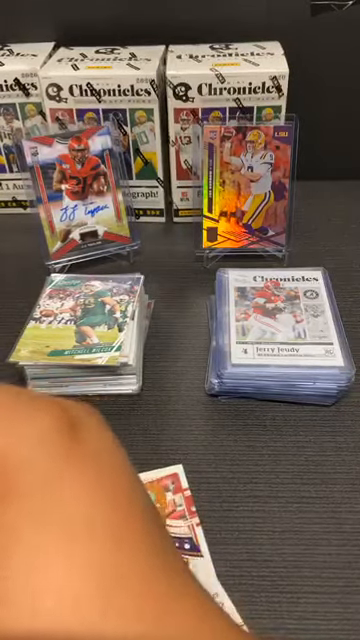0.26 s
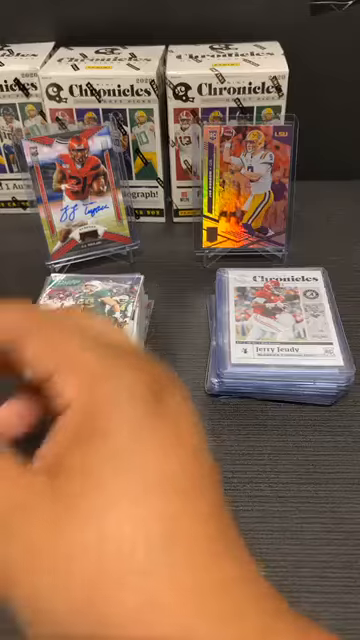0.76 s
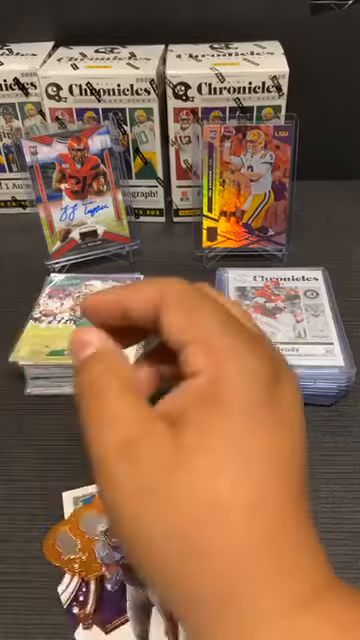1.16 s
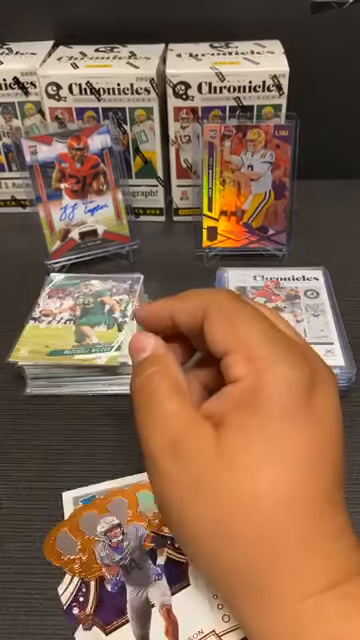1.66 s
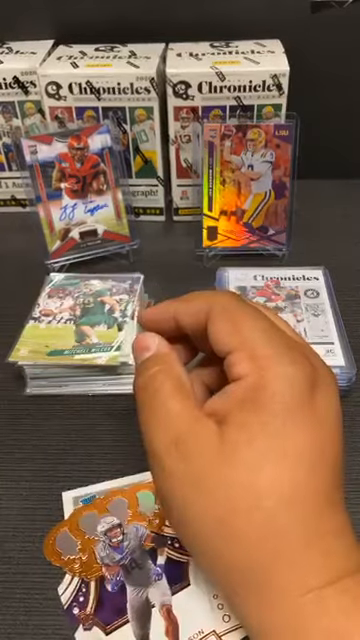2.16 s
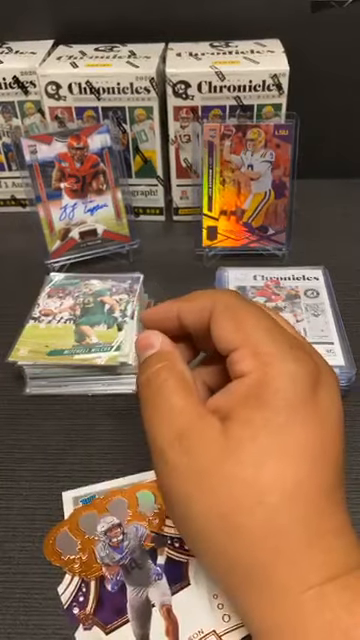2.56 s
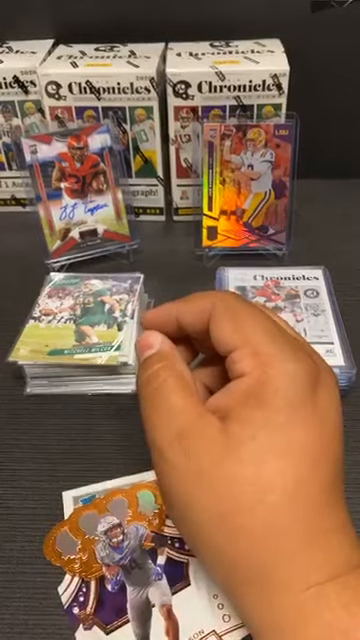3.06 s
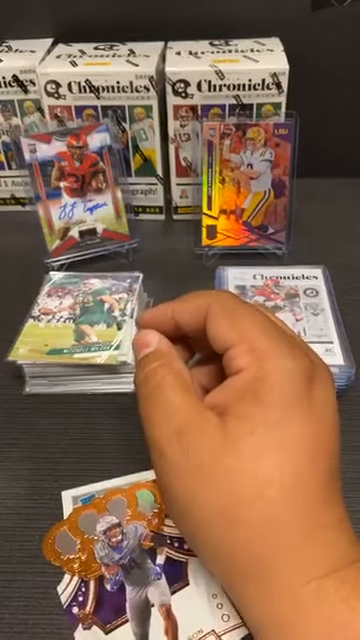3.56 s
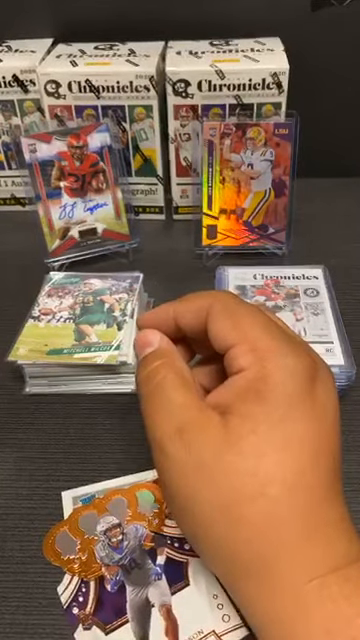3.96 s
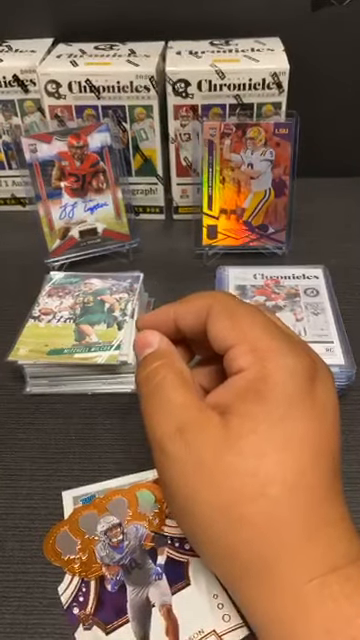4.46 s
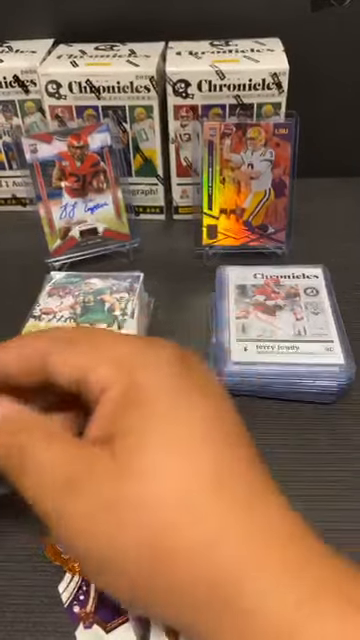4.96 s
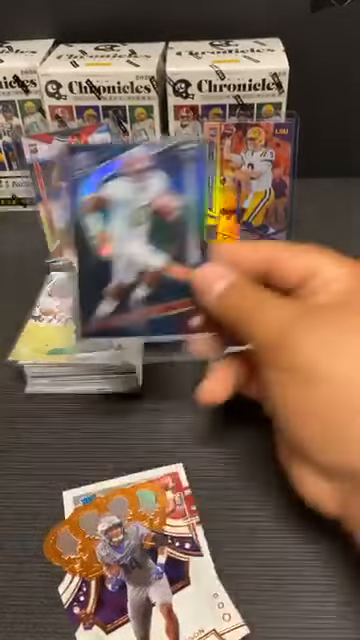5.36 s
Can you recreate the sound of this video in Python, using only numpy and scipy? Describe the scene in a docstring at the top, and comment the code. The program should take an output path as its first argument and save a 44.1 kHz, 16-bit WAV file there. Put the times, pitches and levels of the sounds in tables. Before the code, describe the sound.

After a faint tap or two, a hand knocks firmly on a table at a quick, uneven pace, ending in soft card handling.

```python
"""Knocks on a tabletop

Thirteen knocks close to a phone in a quiet room, with light taps before and after them. Each blow rings
the damped modes of the top as a bending wave: treble travels fastest, so the click comes before the thud.
A noise crack, diffuse tails and slow, wavering resonances go with it. Cards are touched (short noise puffs)
and slide (hiss and drag) over a bed of shaped noise: house rumble, room tone and a steady rustle."""
import sys
import numpy as np
from scipy import signal
from scipy.fft import rfft, irfft, next_fast_len
from scipy.io import wavfile
from scipy.ndimage import uniform_filter1d, map_coordinates

SR = 44100
rng = np.random.default_rng(int(sys.argv[2]) if len(sys.argv) > 2 else 0)


def unload_wav(signal):
    """Save mono or channel-first audio to the path in sys.argv[1] as 16-bit WAV at rate SR, clipped to [-1, 1]."""
    wavfile.write(
        sys.argv[1],
        SR,
        np.round(np.clip(np.atleast_2d(signal).T, -1, 1) * 32767).astype(np.int16),
    )


N = 247037
SIZE = 2 ** 15  # samples in the transform of one blow
BLOW_HZ = np.fft.rfftfreq(SIZE, 1 / SR)
BLOW_T = np.arange(SIZE // 2) / SR  # seconds


def amp(db):
    """Decibels to amplitude."""
    return 10 ** (np.asarray(db) / 20)


def unit(x):
    """Scale to rms 1."""
    return x / np.sqrt(np.mean(x ** 2) + 1e-20)


def along(points, hz):
    """Read a curve of (f/Hz, value) points on a log frequency axis."""
    f, v = np.transpose(points)
    return np.interp(np.log(hz + 1), np.log(f + 1), v)


def filtered(x, response):
    """Multiply the spectrum of x by a function of frequency."""
    m = next_fast_len(N + 8192)
    return irfft(rfft(x, m) * response(np.fft.rfftfreq(m, 1 / SR)), m)[:N]


def add(track, sound, s):
    """Mix a sound in from time s."""
    part = track[round(s * SR):][:len(sound)]
    part += sound[:len(part)]


def wobble(rate, count, t):
    """A smooth random curve through count knots, rate knots per unit of t."""
    return map_coordinates(rng.standard_normal(count), [t * rate])


def rush(spectrum, patchy_db):
    """Shaped noise of rms 1 with random gain patches in time and frequency."""
    z = signal.stft(rng.standard_normal(N), nperseg=1024)[2]
    field = uniform_filter1d(rng.standard_normal(z.shape), 5, 0)
    field = uniform_filter1d(field, 4, 1)
    noise = signal.istft(z * amp(patchy_db * unit(field)), nperseg=1024)[1][:N]
    return unit(filtered(noise, lambda hz: amp(along(spectrum, hz))))


# background levels over time: (t/s, rumble level/dB, room tone level/dB)
FLOOR = [(0.0, -63, -68), (.45, -63.5, -69), (1.2, -61, -68), (2.3, -60.5, -68.5), (3.0, -61.5, -71.5),
         (3.7, -59.5, -62.5), (4.4, -65, -69), (5.6, -66.5, -69.5)]
# noise colours, relative levels: (f/Hz, level/dB)
RUMBLE_COLOUR = [(12, -44), (36, -20.5), (60, 3.5), (97, 1.5), (125, -2), (198, -14.5), (289, -13),
                 (400, -23), (520, -48), (880, -120)]
ROOM_TONE_COLOUR = [(88, -33.5), (150, -8.5), (200, 0), (291, -5.5), (375, -10), (756, -14), (3000, -30),
                    (3900, -53), (6600, -120)]
RUSTLE_COLOUR = [(880, -27.5), (1500, -4), (2450, -12), (3220, -8.5), (3690, -8), (7620, -11), (13600, -21),
                 (15600, -22)]
RUSTLE_DB = -80.5


def background():
    """House rumble and room tone drift in level under a steady rustle."""
    s, *levels = np.transpose(FLOOR)
    rumble, room_tone = [amp(np.interp(np.arange(N) / SR, s, level)) for level in levels]
    bed = rumble * rush(RUMBLE_COLOUR, patchy_db=-0.5)
    bed += room_tone * rush(ROOM_TONE_COLOUR, patchy_db=3.5)
    return bed + amp(RUSTLE_DB) * rush(RUSTLE_COLOUR, patchy_db=2.3)


# cards sliding over each other: (start t/s, length t/s, hiss level/dB, drag level/dB)
SLIDES = [(3.599, 0.65, -82, -79), (4.914, .32, -78.5, -73.5), (5.328, 0.19, -75, -69.5)]
# noise colours of the slide, relative levels: (f/Hz, level/dB)
HISS_COLOUR = [(710, -16), (1200, -3), (1520, -4), (1920, -2), (3180, -8), (3860, -6.5), (7760, -12),
               (15600, -23.5)]
DRAG_COLOUR = [(120, -32.5), (230, -4), (370, 2), (600, -10), (1200, -34)]
SLIDE_EDGE_S = .09  # fade in and out
CATCH_DB, LUMP_DB = 2.5, 1.5  # unevenness of the hiss and of the drag


def slides():
    """Card on card: a hiss that catches and a lumpy low drag, faded in and out on each stroke."""
    t = np.arange(N) / SR
    hiss, drag = np.zeros(N), np.zeros(N)
    for s, length, hiss_db, drag_db in SLIDES:
        from_edge = np.minimum(t - s, s + length - t)
        stroke = np.clip(from_edge / SLIDE_EDGE_S + .5, 0, 1)
        hiss += stroke * amp(hiss_db)
        drag += stroke * amp(drag_db)
    catch = amp(CATCH_DB * wobble(160, int(N * 160 / SR) + 4, t))
    lumps = amp(LUMP_DB * wobble(30, int(N * 30 / SR) + 4, t))
    return hiss * catch * rush(HISS_COLOUR, patchy_db=0.0) + drag * lumps * rush(DRAG_COLOUR, patchy_db=5.0)


# small touches of cards: (t/s, level/dB before rise and decay, centre f/Hz, width/octaves, t60/s)
TOUCHES = [(0.63, -69, 10000, 1.6, 0.1), (0.63, -63.5, 3400, 0.21, 0.019), (.785, -58, 8200, 0.63, 0.026),
           (.795, -65, 7000, 1.5, 0.059), (3.753, -59, 1334, 0.16, 0.24), (3.758, -65, 2520, 0.87, 0.12),
           (4.098, -66, 2500, 1.2, 0.014), (4.272, -64, 3000, 1.7, 0.0082),
           (5.196, -64.5, 1200, 1.6, 0.033), (5.322, -59, 2500, 1.8, 0.0084)]
# fingertips landing just ahead of some knocks: (t/s, level/dB before rise and decay)
FINGERTIPS = [(1.152, -43.5), (1.412, -37.5), (2.529, -34.5), (2.836, -34), (4.451, -55), (4.461, -36.5),
              (4.702, -40.5)]
FINGERTIP_HZ, FINGERTIP_OCTAVES, FINGERTIP_T60_S = 720, 1.4, 0.06
RISE_SHARE = .03  # rise time as a share of t60


def touches():
    """Cards and fingertips: short puffs of noise around a centre pitch, quick to rise and decaying."""
    out, t = np.zeros(N), np.arange(8192) / SR
    hz = np.fft.rfftfreq(len(t), 1 / SR) + 1
    tips = [(s, db, FINGERTIP_HZ, FINGERTIP_OCTAVES, FINGERTIP_T60_S) for s, db in FINGERTIPS]
    for s, db, centre_hz, width, t60 in TOUCHES + tips:
        band = np.exp(-(np.log2(hz / centre_hz) / width) ** 2) / np.sqrt(hz)
        noise = unit(irfft(rfft(rng.standard_normal(len(t))) * band))
        rise = 1 - np.exp(-t / (RISE_SHARE * t60))
        add(out, amp(db - 60 * t / t60) * noise * rise, s)
    return out


def late(s):
    """Delay a blow's spectrum by s seconds."""
    return np.exp(-2j * np.pi * BLOW_HZ * s)


# slow resonances of table and room: (f/Hz, relative level/dB, t60/s)
RESONANCES = [(69.2, -2.5, 0.62), (112.4, 3, 0.4), (247, -7, 0.14), (537, -15.5, 0.24)]
ROOM_DB = -72  # common level over the thud
RING_SCATTER_DB = 3  # random spread from blow to blow
WAVER_DB, WAVER_RATE = 4.5, 23.6  # the resonances beat and break up, knots a second


def slow_resonances(wood):
    """Wavering decaying sines, each as strong as the wood drives its pitch."""
    t = BLOW_T
    drive = uniform_filter1d(abs(wood), 40)
    ring = np.zeros(len(t))
    for f, level, t60 in RESONANCES:
        decay = amp(level + rng.normal(0, RING_SCATTER_DB) - 60 * t / t60)
        waver = amp(WAVER_DB * wobble(WAVER_RATE, 64, t))
        tone = np.sin(2 * np.pi * (f * rng.normal(1, 0.022) * t + rng.random()))
        ring += np.interp(f, BLOW_HZ, drive) * decay * waver * tone
    swell = 1 - np.exp(-(t / 0.01) ** 2)
    return amp(ROOM_DB) * ring * swell


def scatter(decay):
    """A new diffuse tail of energy 1, each frequency dying at its own speed."""
    hz, t, z = signal.stft(rng.standard_normal(SIZE // 2), SR, nperseg=512, noverlap=448)
    fading = z * amp(-60 * t / along(decay, hz)[:, None])
    tail = signal.istft(fading, SR, nperseg=512, noverlap=448)[1]
    return rfft(tail / np.linalg.norm(tail), SIZE)


# share of each blow scattered by table and room, and its decay: (f/Hz, level/dB), (f/Hz, t60/s)
SCATTERED = [(80, -9), (250, -8), (700, -3.5), (2000, -6), (6000, -2.5)]
SCATTERED_DECAY = [(60, 0.086), (160, 0.077), (420, 0.079), (1100, 0.077), (2900, 0.13), (8000, 0.13)]
# the far walls answer late and faintly: (f/Hz, level/dB), (f/Hz, t60/s)
WALLS = [(80, -24.5), (250, -25.5), (600, -18), (2000, -29), (6000, -25)]
WALLS_DECAY = [(100, 0.46), (600, 0.13), (3000, 0.75), (10000, 0.2)]


def reflections():
    """Diffuse sound from table and room after 3.3 ms and from the far walls after 28 ms."""
    near = amp(along(SCATTERED, BLOW_HZ)) * late(0.0033) * scatter(SCATTERED_DECAY)
    far = amp(along(WALLS, BLOW_HZ)) * late(0.028) * scatter(WALLS_DECAY)
    return near + far


# colour of the crack through the air: (f/Hz, level/dB)
CRACK = [(700, -21), (1100, 2.5), (1300, -2), (1700, 7), (2100, -1.5), (2400, 0), (4400, -13),
         (6900, -16.5), (10000, -30), (15500, -39)]
GRAIN_DB = 2.5  # random peaks and gaps in the crack's spectrum, new for each blow
BURST_LUMP_DB, FALL_S = 5, 0.00096  # unevenness of the crack's burst; how fast it dies away


def crack_burst(rise, lead):
    """A lumpy noise burst of energy 1 that swells briefly, then dies away."""
    since = BLOW_T - lead - .001
    shape = np.exp(np.where(since < 0, since / max(rise, 2e-4), -since / FALL_S))
    lumps = amp(BURST_LUMP_DB * wobble(900, 400, BLOW_T))
    burst = rng.standard_normal(len(BLOW_T)) * shape * lumps
    return rfft(burst / np.linalg.norm(burst), SIZE)


def crack_colour(strength_db, snap_db, air_db):
    """Spectrum of the crack, tilted by its levels at 2.5 and 9 kHz."""
    tilt = along([(2500, snap_db), (9000, air_db)], BLOW_HZ)
    return amp(strength_db + along(CRACK, BLOW_HZ) + tilt)


def bending(hz):
    """Bending waves go as fast as the root of frequency, so lows lag: delay .1005 / sqrt(hz) s, less 4 ms."""
    return np.exp(-2j * np.pi * (.201 * np.sqrt(hz) - .004 * hz + .25))


def mode(centre, width):
    """Response of one damped mode, from its centre and width in Hz."""
    return 1j * BLOW_HZ * width / (centre ** 2 - BLOW_HZ ** 2 + 1j * BLOW_HZ * width)


# modes of the tabletop, neighbours in opposite phase: (f/Hz, width/Hz)
TOP_MODES = [(82.5, 63.3), (106, 90.8), (188, 48.7), (273, 62.3), (370, 91.7), (440, 147), (734, 212),
             (953, 145)]
# how a blow drives each mode of the top: (level/dB, dB per unit of heft, dB per unit of spot)
DRIVE = [(20.5, 9, 1.5), (26.94, 5, 1.99), (25.04, -3.06, 7), (23.4, -2.5, 5), (21.83, -1.3, -5),
         (15.26, -3.5, -8), (13.9, -2.5, -2.2), (9, -4.03, -3.9)]
BRIGHT_FROM_HZ = 240  # brightness tilts the modes above this


def mode_levels(strength_db, heft, spot, bright):
    """Heft, spot and brightness decide how hard a blow drives each mode, in dB."""
    base_db, per_heft, per_spot = np.transpose(DRIVE)
    octaves = np.log2(np.maximum(np.transpose(TOP_MODES)[0] / BRIGHT_FROM_HZ, 1))
    return strength_db + base_db + heft * per_heft + spot * per_spot + bright * octaves


# blows on the top, knocks and light taps: (t/s, strength level/dB, heft from knuckle -2 to whole fist 2,
# spot across the top -1.5 to 2.3, brightness/dB per octave, crack level/dB over the strength at 2.5 kHz
# and at 9 kHz, rise time of the crack t/s, rebound level/dB)
BLOWS = [(0.196, -27, 1.42, -0.97, -11, -25, -10, .002, -18),
         (.628, -39.5, 1.6, -1.44, 3.5, -2, -12, .001, -8),
         (.79, -41.5, 1.75, 0.54, 6.5, 0, -4, 0.0011, -19),
         (.887, -34.5, 0.7, -0.83, -1.5, -17, -15, .001, -21),
         (1.1579, -2, 0.87, 0.74, 3, -12.5, -18, 0.0025, -1.5),
         (1.4165, -3.5, 1.8, -0.84, 1, -23.5, -14.5, 0.01, -22),
         (1.654, 0.2, -0.33, 0.0051, -1.5, -15.5, -20.5, 0.0016, -9.5),
         (1.9034, 2, -0.02, -0.23, 2.5, -1.6, -7, 0.0003, -22),
         (2.0805, -6.5, 0.53, -1.02, -2, -16.5, -19.5, 0.0016, -11),
         (2.5332, -6.5, 2, 2.26, 7.5, -13, -12, 0.0036, -21),
         (2.8384, -4.6, 0.9, 1.73, 3, -9, -10.5, 0.0042, -15.5),
         (3.1042, 3, -0.38, -.1, 0.4, -6.5, -10, 0.0035, -16),
         (3.3641, 2.1, 0.1, -0.059, 0.5, -8.5, -8, 0.0018, -13.5),
         (3.6041, 3.5, 0.84, -0.54, 2, -8, -11.5, 0.0016, -8),
         (4.174, 4, -1.5, -0.4, -1.5, -15.5, -12.5, 0.0023, -8.5),
         (4.4649, -0.5, 1.96, -0.22, 0, -15, -8.5, 0.0029, -16.5),
         (4.712, 1.5, 1.38, 1, 6.5, -12.5, -11, .00083, -15.5),
         (5.303, -41.5, 0.7, -0.43, 3, 4.5, -8, .001, -12),
         (5.451, -38, 1.8, -.6, 5.5, 2.5, -7, .0015, -10)]
REBOUND_S, REBOUND_HZ = 0.01162, 278  # the hand lands again, softly
AHEAD_DB = -9.5  # ring before the click, over the seventh mode


def knocks():
    """Each blow: modes of the top, the crack through the air, their scatter, and slow resonances."""
    out = np.zeros(N)
    lead = .03  # seconds of room for sound ahead of the blow
    modes = np.array([(-1) ** k * mode(*row) for k, row in enumerate(TOP_MODES)])
    soft = 1 / (1 + (BLOW_HZ / 1250) ** 8)  # skin on wood drives no high modes
    for s, strength_db, heft, spot, bright, snap_db, air_db, rise, rebound_db in BLOWS:
        db = mode_levels(strength_db, heft, spot, bright)
        wood = amp(db) @ modes * soft * bending(BLOW_HZ)
        wood = wood * (1 + amp(rebound_db) * late(REBOUND_S) / (1 + (BLOW_HZ / REBOUND_HZ) ** 2))
        # the conjugate runs backwards: a faint ring near 700 Hz swells just ahead of the click
        ahead = amp(AHEAD_DB + db[6]) * np.conj(mode(700, 90)) * soft
        colour = crack_colour(strength_db, snap_db, air_db)
        grain = amp(GRAIN_DB * wobble(4, 64, np.log2(BLOW_HZ + 1)))  # four knots an octave
        crack = colour * grain * crack_burst(rise, lead)
        diffuse = reflections() * (wood + colour)
        add(out, irfft((wood + ahead + diffuse) * late(lead) + crack, SIZE), s - lead)
        add(out, slow_resonances(wood), s)
    return out


def scene():
    """Background, cards and blows in one channel."""
    return (background() + slides() + touches() + knocks())[None]


TOP_HZ = 15730  # band limit of the phone


def record(dry):
    """The phone cuts the deepest bass and keeps nothing above its band limit but a trace of hiss."""
    def band(hz):
        bass = (hz / 55) ** 2
        return (hz < TOP_HZ) * -bass / (1 + 1.4j * hz / 55 - bass)  # second-order high-pass at 55 Hz
    return filtered(dry[0], band)[None] + amp(-105) * rng.standard_normal((1, N))


dry = scene()
out = record(dry)
unload_wav(out)
```